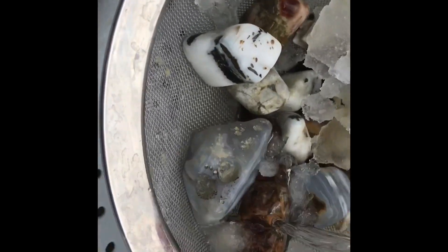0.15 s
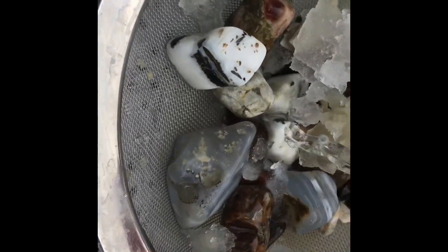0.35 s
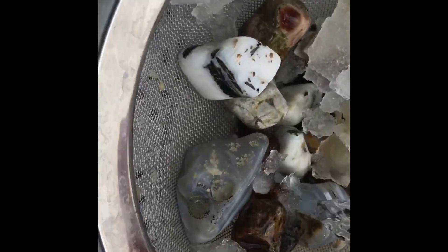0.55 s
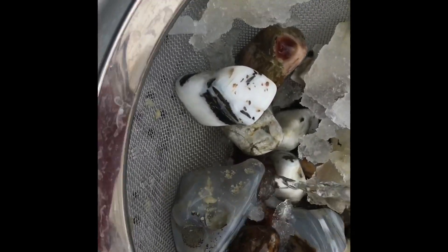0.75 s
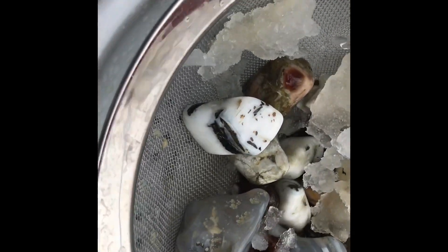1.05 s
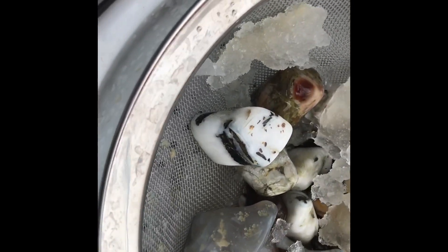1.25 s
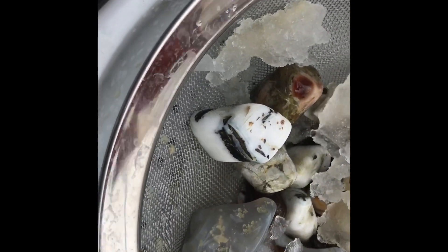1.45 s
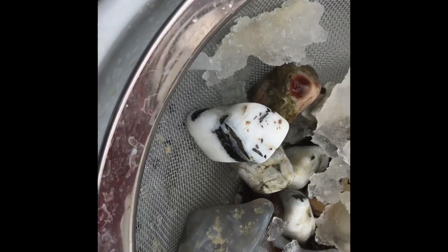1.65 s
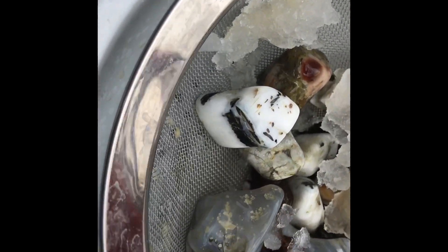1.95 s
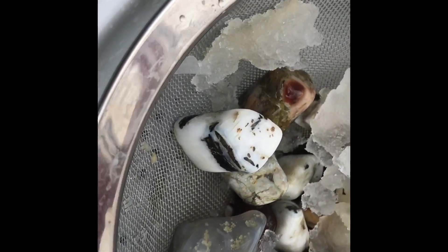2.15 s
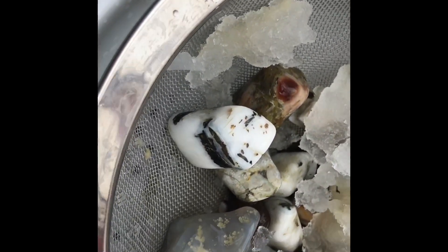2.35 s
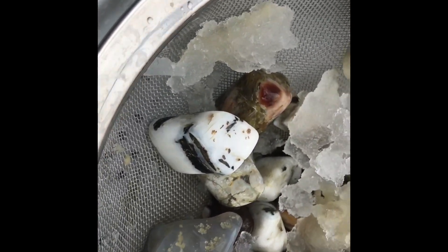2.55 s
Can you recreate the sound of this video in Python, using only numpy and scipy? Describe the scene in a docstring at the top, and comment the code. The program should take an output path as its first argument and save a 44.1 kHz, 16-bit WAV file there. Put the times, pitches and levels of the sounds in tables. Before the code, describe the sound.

Light trickling water ticks and plips through stones in a gently bumping metal strainer.

```python
"""At a basin in a quiet room, water trickles over wet stones in a hand-held mesh strainer.
Drop impacts tick on stone and mesh, water splats through the gaps, and trapped bubbles ring as damped
oscillators. A fine crackle comes in spurts that thin out as the water drains, and the impacts excite
the resonances of strainer and basin. The strainer bumps softly over a low room hum; towards the end
come two hollow plops and two faint whistles."""
import sys
import numpy as np
from scipy import signal
from scipy.io import wavfile

SR = 44100
rng = np.random.default_rng(int(sys.argv[2]) if len(sys.argv) > 2 else 0)


def unload_audio(sound):
    """Save the sound as a 16-bit wav file, at the path given as the first command line argument."""
    columns = np.transpose(np.atleast_2d(sound))
    # keep every value between -1 and 1, then stretch to whole-number steps
    steps = np.round(np.clip(columns, -1, 1) * 32767)
    wavfile.write(sys.argv[1], SR, steps.astype(np.int16))


N = 119070

# Spectrum of the room's hum and hiss: frequency_hz, density_db
ROOM_SPECTRUM = [(20, -14.5), (62, 8.5), (125, -11.5), (300, -2.5), (520, -18.5), (950, -16), (1700, -22.5),
                 (2800, -34.5), (8000, -53.5), (15000, -30)]
# Envelope of the handling rumble: time_s, level_db
RUMBLE_ENVELOPE = [(0, -57), (.27, -50.5), (.32, -52.5), (.38, -69), (.74, -50), (.8, -40), (.88, -41.5),
                   (.94, -48.5), (1.14, -51), (1.2, -47), (1.28, -59), (1.35, -35), (1.385, -55.5),
                   (1.46, -43.5), (1.5, -54), (1.7, -55.5), (1.79, -53.5), (1.93, -49), (2.03, -55.5),
                   (2.11, -50), (2.2, -53.5)]
# Spectrum of the handling rumble: frequency_hz, density_db
RUMBLE_SPECTRUM = [(20, -70), (45, -1.5), (80, -1), (140, -2.5), (280, -10.5), (400, -13), (600, -30.5),
                   (1500, -66)]
# Soft bumps of the strainer: start_s, pitch_hz, peak_db
STRAINER_BUMPS = [(0.311, 79, -34.5), (0.793, 225, -33.5), (0.848, 128, -36), (0.868, 115, -34),
                  (1.193, 74, -34.5), (1.339, 104, -28), (1.346, 280, -39), (1.404, 120, -29.5),
                  (1.452, 97, -30)]
# Envelope of the trickle: time_s, relative_level_db
FLOW_ENVELOPE = [(0, -56), (.085, -57.5), (.12, -55), (.2, -56.5), (.27, -50), (.31, -41.5), (.35, -43),
                 (.43, -52), (.505, -55.5), (.61, -60), (.78, -57), (.86, -49.5), (.925, -60.5),
                 (.96, -48.5), (1.04, -43.5), (1.09, -52), (1.16, -59.5), (1.2, -53.5), (1.27, -58),
                 (1.45, -60), (1.5, -45.5), (1.565, -41.5), (1.6, -59), (1.76, -57), (1.83, -55),
                 (2.15, -58), (2.7, -57)]
# Spectrum of splashing water: frequency_hz, density_db
SPLASH_SPECTRUM = [(300, -3), (900, -2.5), (1350, -2.5), (2600, -4.5), (4300, -3.5), (6300, -5.5),
                   (9000, -8.5), (15000, -1.5)]
# Strength of the tiny bubbles by pitch: pitch_hz, relative_level_db
FIZZ_SPECTRUM = [(2200, -10.5), (4200, 1.5), (9000, 7.5), (15000, 5)]
# Envelope of the gurgle between the stones: time_s, level_db
GURGLE_ENVELOPE = [(0, -56.5), (.29, -49), (.34, -46.5), (.47, -54.5), (.75, -63.5), (2.7, -101)]
# Drops striking stone and mesh: start_s, relative_level_db, resonance_hz
DROP_IMPACTS = [(.007, -31, 5170), (0.0395, -24, 1920), (0.15, -29, 5630), (0.1708, -29.5, 4500),
                (.238, -21, 3140), (0.279, -13, 16500), (0.3012, -21, 9700), (.324, -27, 9300),
                (.331, -21, 13200), (.3395, -22, 11600), (.3895, -23, 4740), (0.4201, -21.5, 6900),
                (0.4516, -29.5, 5500), (0.4619, -24.5, 12500), (0.466, -24.5, 5850), (0.52, -34.5, 4200),
                (.5265, -31.5, 593), (.534, -29, 7200), (.563, -24.5, 3970), (0.6535, -30.5, 8600),
                (0.7239, -31, 7000), (0.8379, -16.5, 14200), (.850, -28, 4280), (.907, -33, 9200),
                (0.943, -25.5, 10500), (1.0003, -22, 15200), (1.0371, -25, 1500), (1.183, -29.5, 1800),
                (1.3057, -30, 13300), (1.308, -28, 635), (1.3727, -23.5, 15600), (1.5038, -17, 12750),
                (1.7203, -27.5, 13900), (1.7974, -29, 9900), (1.8229, -28, 12000), (1.8434, -31, 14100),
                (1.849, -33.5, 5100), (1.958, -37, 4100), (1.994, -37, 5260), (2.097, -28, 8700),
                (2.3644, -29, 11200)]
# Spectrum of a drop impact: frequency_hz, density_db
IMPACT_SPECTRUM = [(300, -11.5), (650, -5), (920, 0), (1400, -12), (2600, -8.5), (4200, -2.5), (6300, -0.5),
                   (8000, -5.5), (15000, 0)]
# Single trapped bubbles: start_s, pitch_hz, relative_peak_db, decay_cycles (to fall by 1/e)
TRAPPED_BUBBLES = [(.0385, 1850, -34.5, 1.9), (0.127, 1835, -23.5, 6.1), (0.2124, 3800, -37.5, 18),
                   (0.2263, 5880, -16, 3.9), (0.255, 1207, -25.5, 4.8), (0.2809, 3640, -23, 9.6),
                   (.326, 1600, -30.5, 5.3), (0.3528, 1720, -28, 5.7), (0.3533, 2020, -25, 4),
                   (.3745, 2170, -35, 6), (0.3859, 1330, -29, 2.5), (.392, 4043, -17.5, 9.4),
                   (.4100, 1530, -20, 1.05), (.4243, 3110, -23.5, 6), (.429, 1385, -25, 3.8),
                   (0.4876, 8430, -23, 6.5), (.5420, 4030, -32.5, 5.6), (0.6337, 1375, -38.5, 5.3),
                   (.652, 4500, -34, 5.2), (0.695, 1950, -33, 0.97), (.813, 3630, -34, 6.6),
                   (0.8377, 6370, -20.5, 3.5), (0.8735, 1763, -23, 6.8), (0.8772, 2096, -29.5, 3.9),
                   (0.885, 6580, -32.5, 17), (.9460, 6200, -26, 7.9), (1.038, 1400, -40.5, 2),
                   (1.231, 6100, -35, 6.1), (1.2971, 6300, -34.5, 6.4), (1.3485, 894, -36, 4.7),
                   (1.5019, 3100, -32, 7.2), (1.524, 1970, -28, 1.55), (1.6181, 7150, -26.5, 14),
                   (1.722, 1514, -35, 2.5), (1.726, 2280, -43.5, 11) ]
# Water squeezed between the stones: start_s, decay_s, level_db, resonance_hz
GAP_SPLATS = [(0.125, 0.0034, -26, 2240), (.184, .006, -34, 9450), (0.366, 0.0029, -25, 4270),
              (0.3727, 0.0024, -28, 5850), (0.4067, 0.004, -30.5, 4300), (0.422, 0.0067, -27, 3110),
              (0.878, 0.012, -38, 2010), (1.5004, 0.0029, -44, 3080), (1.512, 0.0039, -41, 2210),
              (1.523, 0.0088, -38.5, 2620), (1.559, 0.013, -40.5, 3370), (1.616, 0.0048, -36, 2170),
              (1.655, 0.01, -47, 5130), (1.721, 0.0039, -41.5, 2620), (1.879, 0.0073, -42, 6300)]
# Hollow plops: start_s, peak_db
HOLLOW_PLOPS = [(1.6765, -29), (2.1441, -30.5)]
# Faint whistles: start_s
WHISTLE_STARTS = [2.12, 2.38]
# Normal modes of strainer and basin: frequency_hz, bandwidth_hz, gain_db
NORMAL_MODES = [(669, 21, 6), (1290, 330, -2), (1705, 143, 3.5), (3150, 810, -14.5), (4360, 630, -9.5)]


def amp(db):
    """Amplitude ratio: a factor of ten for every 20 dB."""
    return 10 ** (np.asarray(db) / 20)


def unit_rms(x):
    """Normalisation to a mean power of one."""
    return x / np.sqrt(np.mean(x ** 2) + 1e-20)


def spectrum_db(points, hz):
    """Interpolation of a spectrum on a logarithmic frequency axis."""
    frequencies, db = np.transpose(points)
    return np.interp(np.log(hz + 1), np.log(frequencies + 1), db)


def seconds(size):
    """Uniformly sampled time axis."""
    return np.arange(size) / SR


def envelope(points):
    """Straight lines in decibels give exponential growth and decay in amplitude."""
    return amp(np.interp(seconds(N), *np.transpose(points)))


def add(mix, start_s, sound):
    """Superposition: a sound adds linearly to the mix from its onset."""
    part = mix[max(round(start_s * SR), 0):][:len(sound)]
    part += sound[:len(part)]


def colour(x, spectrum, ring_hz=None, ring_db=None, half_width_octaves=0.2, size=2048):
    """A minimum-phase filter of unit energy imposes a spectrum and, optionally, one resonance."""
    hz = abs(np.fft.fftfreq(size, 1 / SR))
    db = spectrum_db(spectrum, hz)
    if ring_hz:
        db = db + ring_db / (1 + (np.log2((hz + 1) / ring_hz) / half_width_octaves) ** 2)
    log_response = np.conj(signal.hilbert(np.log(amp(db))))
    taps = np.fft.ifft(np.exp(log_response)).real
    return signal.fftconvolve(x, taps / np.linalg.norm(taps))[:len(x)]


def patter(per_s, spread_db):
    """A Poisson process of impulses, mostly small with a few large."""
    strength = amp(spread_db * np.minimum(rng.exponential(1, N), 4))
    return strength * rng.choice([-1, 1], N) * (rng.random(N) < per_s / SR)


def room_tone(level_db=-53, sympathy_db=-8.5):
    """Steady hum and hiss drive the basin in sympathetic resonance."""
    air = amp(level_db) * unit_rms(colour(rng.standard_normal(N), ROOM_SPECTRUM, size=8192))
    return air + amp(sympathy_db) * basin_resonance(air)


def strainer_handling(rise_s=0.0014, decay_s=0.0096):
    """Tilting the strainer makes a dull rumble, and each bump excites a damped low vibration."""
    rumble = unit_rms(colour(rng.standard_normal(N), RUMBLE_SPECTRUM, size=8192))
    out, t = envelope(RUMBLE_ENVELOPE) * rumble, seconds(5000)
    shape = (1 - np.exp(-t / rise_s)) * np.exp(-t / decay_s)
    for start_s, hz, db in STRAINER_BUMPS:
        add(out, start_s, amp(db) * shape / shape.max() * np.sin(2 * np.pi * hz * t))
    return out


def bubble(hz, decay_cycles=6.4, rise_cycles=1.1, roughness=0.42, glide_per_decay=0.027):
    """Trapped air is a spring and the water a mass; the stones damp the ring as its pitch creeps up."""
    cycles = hz * seconds(2600)
    age = cycles / decay_cycles
    shape = (1 - np.exp(-(cycles / rise_cycles) ** 2)) * np.exp(-age ** 0.93)
    # Amplitude and phase wander to a new random value every two cycles.
    swell, shift = (roughness * np.interp(cycles / 2, np.arange(64), row)
                    for row in rng.standard_normal((2, 64)))
    pitch_hz = hz * (1 + glide_per_decay * (np.minimum(age, 2) - 1))
    phase = 2 * np.pi * np.cumsum(pitch_hz) / SR
    return shape / shape.max() * (1 + swell / 2) * np.sin(phase + shift)


def bubble_stream(hz, per_s, spread_db):
    """Convolution repeats the impulse response of one bubble at random times and strengths."""
    return signal.oaconvolve(patter(per_s, spread_db), bubble(hz))[:N]


def trickle(spray_db=-3, spray_decay_s=0.0016, fizz_db=2, fizz_per_s=900, drain_db_per_s=4.5, sizes=40):
    """Shot noise of tiny splashes and bubbles follows the flow; the bubbles fade as the water drains."""
    hits = abs(patter(per_s=1500, spread_db=4))
    splashes = signal.oaconvolve(hits, np.exp(-seconds(400) / spray_decay_s))[:N]
    spray = colour(splashes * rng.standard_normal(N), SPLASH_SPECTRUM)
    pitches = np.geomspace(FIZZ_SPECTRUM[0][0], FIZZ_SPECTRUM[-1][0], sizes)
    fizz = sum(amp(spectrum_db(FIZZ_SPECTRUM, hz)) * bubble_stream(hz, fizz_per_s / sizes, spread_db=4.5)
               for hz in pitches)
    fizz_gain = amp(fizz_db - drain_db_per_s * seconds(N))
    return envelope(FLOW_ENVELOPE) * (amp(spray_db) * unit_rms(spray) + fizz_gain * unit_rms(fizz))


def gurgle(low_hz=1162, high_hz=2187, per_s=350, sizes=16):
    """Larger bubbles resonate lower, overlapping while water remains between the stones."""
    pitches = np.geomspace(low_hz, high_hz, sizes)
    ringing = sum(bubble_stream(hz, per_s / sizes, spread_db=3.5) for hz in pitches)
    return envelope(GURGLE_ENVELOPE) * unit_rms(ringing)


def drop_ticks(crack_s=0.00044, splatter_s=0.00041, splatter_db=-4, gain_db=4):
    """A brief impact has a broad spectrum, coloured by the resonance of the spot it strikes."""
    out, t = np.zeros(N), seconds(1024)
    age = t / crack_s
    shape = age ** 2 * np.exp(2 - 2 * age) + amp(splatter_db) * np.exp(-t / splatter_s)
    for start_s, db, hz in DROP_IMPACTS:
        crack = colour(shape * rng.choice([-1, 1], len(t)), IMPACT_SPECTRUM, hz, ring_db=14)
        add(out, start_s, amp(db + gain_db) * 2 * crack / np.linalg.norm(crack))
    return out


def bubble_plips(gain_db=1):
    """Single bubbles oscillate freely near their natural frequencies, each a clear plip."""
    out = np.zeros(N)
    for start_s, hz, db, decay_cycles in TRAPPED_BUBBLES:
        add(out, start_s, amp(db + gain_db) * bubble(hz, decay_cycles))
    return out


def splats(rise_s=0.00063):
    """Water squeezed through a gap gives a noise burst, filtered by the resonance of that gap."""
    out, t = np.zeros(N), seconds(2048)
    for start_s, decay_s, db, hz in GAP_SPLATS:
        shape = (1 - np.exp(-t / rise_s)) * np.exp(-(t / decay_s) ** 2)
        burst = colour(shape * rng.choice([-1, 1], len(t)), SPLASH_SPECTRUM, hz, ring_db=14.5)
        add(out, start_s, amp(db) * np.linalg.norm(shape) * burst / np.linalg.norm(burst))
    return out


def plops(start_hz=1420, fall_s=0.0032, peak_s=0.001):
    """A downward chirp only a few cycles long is heard as a hollow pop."""
    out, t = np.zeros(N), seconds(400)
    shape = t / peak_s * np.exp((1 - (t / peak_s) ** 2) / 2)
    phase = 2 * np.pi * np.cumsum(start_hz * np.exp(-t / fall_s)) / SR
    for start_s, db in HOLLOW_PLOPS:
        add(out, start_s, amp(db) * shape * np.sin(phase))
    return out


def whistles(length_s=0.153, base_hz=3700, arch_hz=128.5, peak_db=-66):
    """One arch modulates the frequency and amplitude of a thin tone, so both rise and fall together."""
    out, t = np.zeros(N), np.arange(0, length_s, 1 / SR)
    arch = np.sin(np.pi * t / length_s)
    phase = 2 * np.pi * np.cumsum(base_hz + arch_hz * arch) / SR
    for start_s in WHISTLE_STARTS:
        add(out, start_s, amp(peak_db) * arch * np.sin(phase))
    return out


def basin_resonance(x):
    """The normal modes of strainer and basin respond as parallel damped resonators."""
    return sum(amp(db) * signal.lfilter(*signal.iirpeak(hz, hz / width_hz, SR), x)
               for hz, width_hz, db in NORMAL_MODES)


def reflections(x, t60_s, first_s, per_s):
    """Reverberation is a sum of randomly delayed reflections, falling by 60 dB in t60_s."""
    t = seconds(16000)
    polarity = rng.choice([-1, 1], len(t))
    arrivals = (rng.random(len(t)) < per_s / SR) & (t > first_s)
    taps = polarity * arrivals * np.exp(-np.log(1000) * t / t60_s)
    return signal.oaconvolve(x, taps / (np.linalg.norm(taps) + 1e-12))[:N]


def scene():
    """Direct and reflected water sounds superpose on the handling and the hum."""
    background = room_tone() + strainer_handling() + whistles()
    impacts = drop_ticks() + splats() + trickle()
    water = impacts + basin_resonance(impacts) + bubble_plips() + gurgle()
    near = amp(-9) * reflections(water, t60_s=0.011, first_s=0.002, per_s=3900)
    room = amp(-29) * reflections(water, t60_s=0.2, first_s=0.0096, per_s=3200)
    return (background + plops() + water + near + room)[None]


def record(dry):
    """A linear-phase low-pass filter limits the bandwidth."""
    cutoff_hz = 15950
    taps = signal.firwin(401, cutoff_hz, window=("kaiser", 8), fs=SR)
    return signal.oaconvolve(dry, taps[None], "same")


dry = scene()
out = record(dry)
unload_audio(out)
```